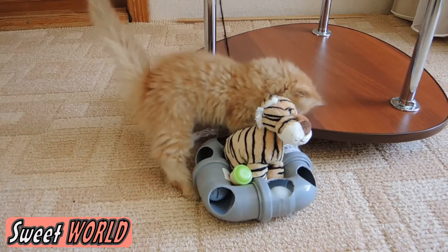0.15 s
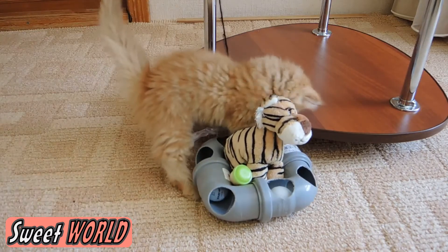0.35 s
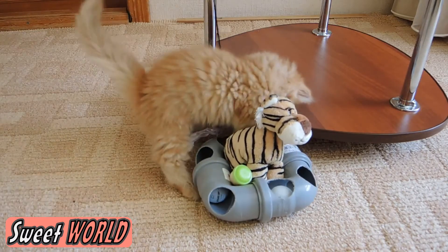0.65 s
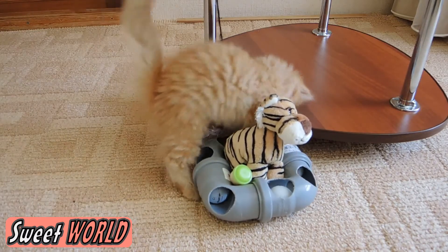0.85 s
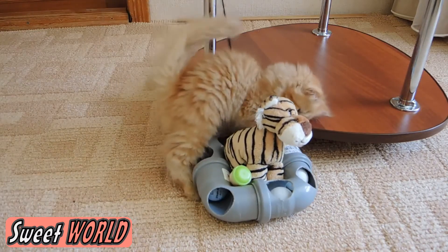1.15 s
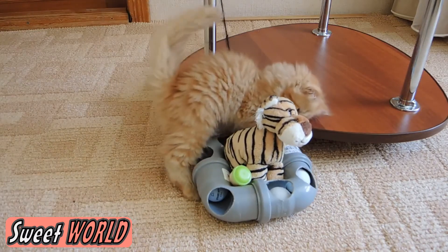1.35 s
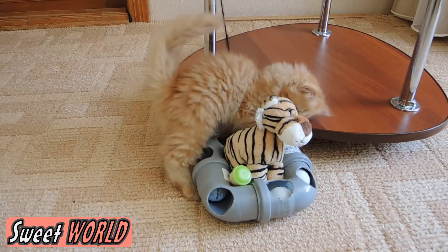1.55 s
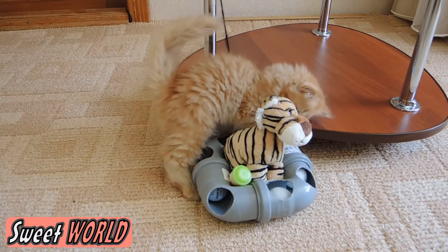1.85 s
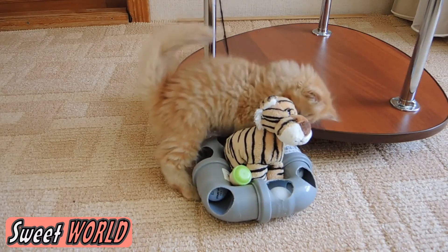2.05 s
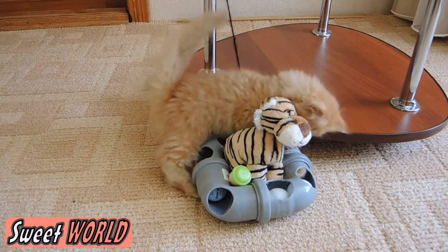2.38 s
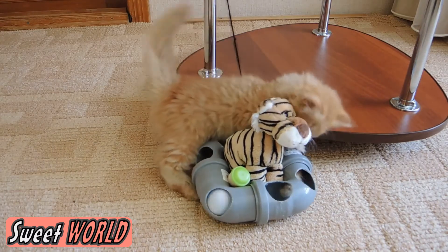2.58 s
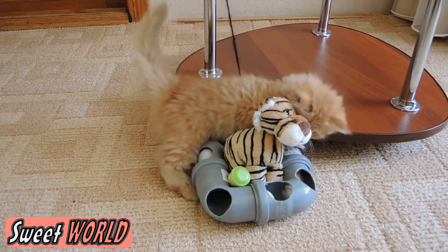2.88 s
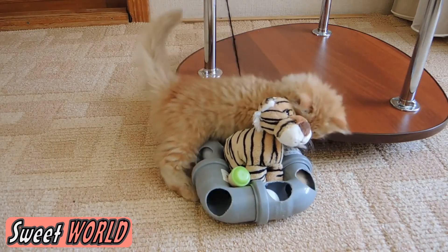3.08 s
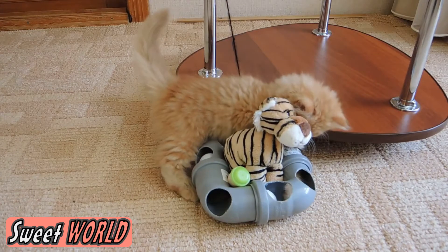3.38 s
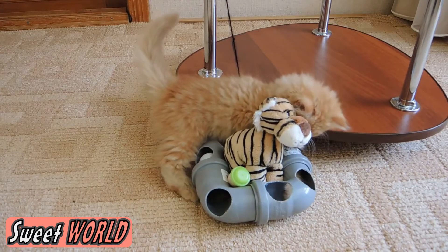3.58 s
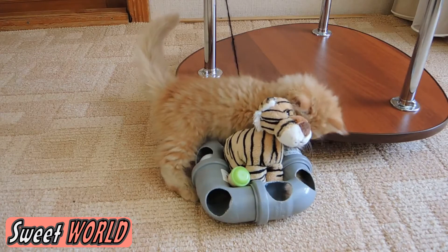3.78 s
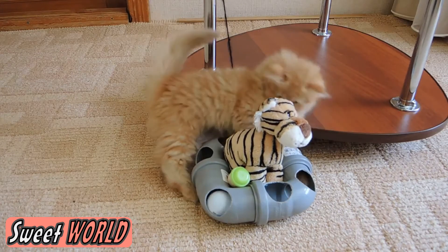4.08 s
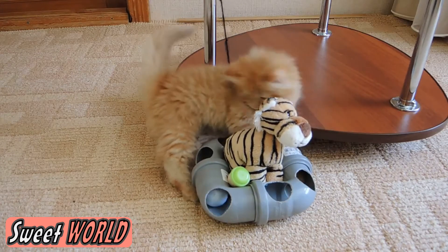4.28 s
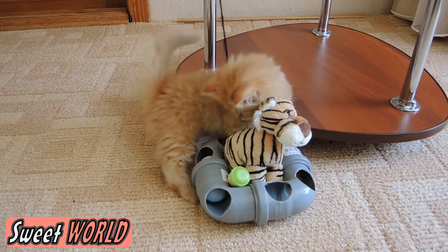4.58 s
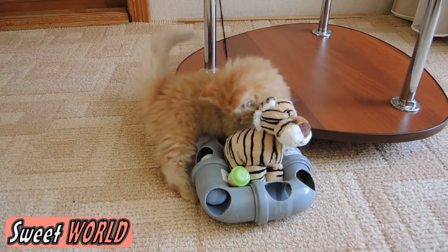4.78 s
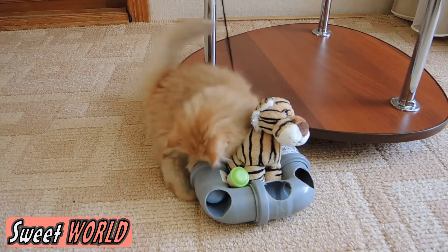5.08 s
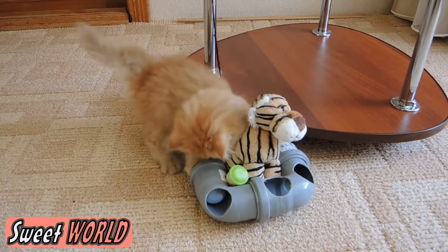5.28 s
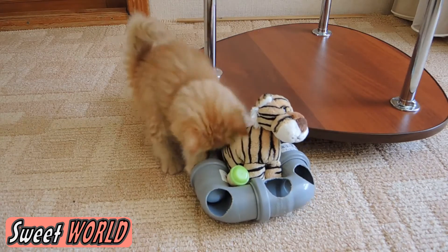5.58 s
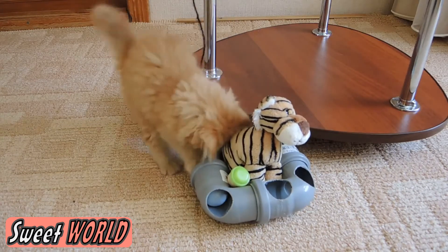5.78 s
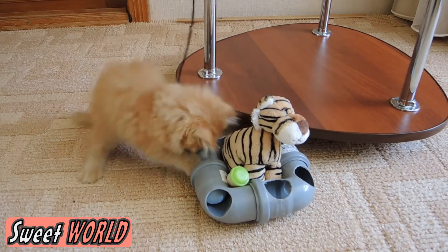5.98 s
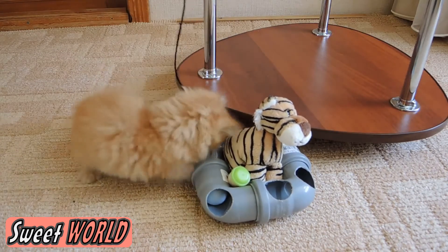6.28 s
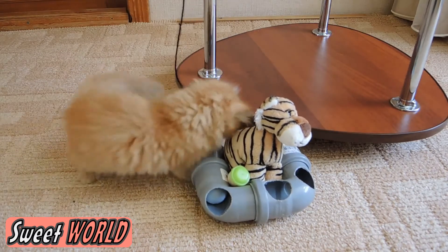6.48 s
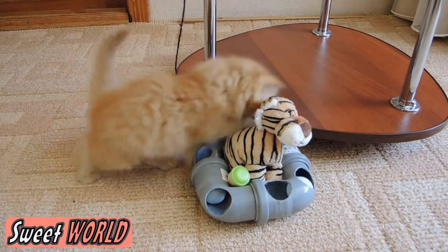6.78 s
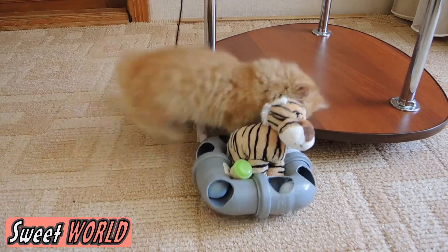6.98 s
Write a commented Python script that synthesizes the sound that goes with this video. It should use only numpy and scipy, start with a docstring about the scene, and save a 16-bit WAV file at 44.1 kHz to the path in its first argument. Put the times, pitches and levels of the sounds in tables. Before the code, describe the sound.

A quiet furnished room has steady faint hiss, low rumble and barely audible hum, with soft fur brushing that swells irregularly. A tiny knock comes at 0.1 s, then faint rubs around 0.8-1 s. At 2.3-2.6 s, small plastic ticks and a light scrape lead to a loud, dense burst from 2.75 to 2.95 s: hollow clacks, bright clicks and a short rolling rattle, fading to ticks by 3.2 s. Weak taps follow at 3.3 and 3.6 s, others at 4.2 and 4.4 s, then one clear hollow knock at 4.56 s. Around 5.25 s there is a light click with a very soft paw thump. Faint scuffing precedes gentle thuds and small taps at 6.2 s, a crisp bright scrape at 6.39 s, and an uneven hollow clatter with rolling from 6.43 to 6.9 s. A last soft tap and brief roll come near 7.05 s. The echo is short and carpet-damped.

```python
"""Faint hiss, house hum and brushing fur run throughout, while a kitten knocks and scrapes a plastic ball track.
Knocks sum ringing tube modes, a pumped air pulse, a wall clack and a rim tick; shoves roll the hollow ball,
which rumbles as random jolts ring the tube and chatters as light blows. Paw and fur strokes are dense noise
grains; paws land as decaying sines. A short echo places the toy in a furnished, carpeted room."""
import sys
import numpy as np
from scipy import signal
from scipy.fft import rfft, irfft, next_fast_len
from scipy.io import wavfile
from scipy.ndimage import uniform_filter1d

SR = 44100
rng = np.random.default_rng(int(sys.argv[2]) if len(sys.argv) > 2 else 0)


def store_wav(level_fs):
    """Save 16-bit WAV to argv[1]."""
    pcm = np.round(np.clip(np.atleast_2d(level_fs), -1, 1) * 32767)
    wavfile.write(sys.argv[1], SR, pcm.T.astype(np.int16))


N = 314874

# room tone and hiss, relative density: freq_hz, density_db
AIR_SPECTRUM = [(15, -16), (30, 0.5), (45, -7), (70, -1.5), (95, -4), (130, -1.5), (240, -1), (330, -4),
                (430, -2.5), (800, -9), (1500, -13.5), (5500, -17.5), (13800, -22), (15000, -58)]
# house hum: pitch_hz, rms_db
HUM_TONES = [(68, -73), (228, -72)]
# room tone, difference between microphone ports: freq_hz, side_minus_mid_db
AIR_SIDE_SPECTRUM = [(60, -7), (380, -8.5), (700, -5.5), (1300, -3.5), (3000, -2.5), (15000, -3)]
# paw and fur strokes, before port colour: peak_s, rise_s, level_db, treble_minus_rest_db
PAW_STROKES = [(0.15, 0.047, -64.5, 3), (0.818, 0.003, -58, -17), (0.87, 0.004, -56, -12),
               (0.97, 0.056, -59, 2), (2.135, 0.025, -59, 6), (2.425, 0.061, -50.5, 7),
               (2.55, 0.027, -48.5, -2), (2.704, 0.029, -45.5, 0), (2.735, 0.006, -36, 10),
               (2.755, 0.012, -30, 4), (2.779, 0.01, -33.5, 5), (2.833, 0.01, -37, 1),
               (2.94, 0.093, -49, 5), (3.225, 0.044, -53.5, 11), (4.39, 0.029, -62, 0),
               (5.157, 0.019, -55, -2), (5.37, 0.034, -58, 3), (5.52, 0.074, -61.5, 1),
               (5.80, 0.061, -57, 4.5), (5.942, .016, -44, 16), (6.014, .013, -48, 3),
               (6.155, 0.022, -49, -1), (6.26, .03, -47.5, -1), (6.338, .011, -48, -4),
               (6.389, 0.015, -29.5, 16), (6.393, 0.027, -34, -2), (6.667, 0.018, -35.5, 7),
               (6.703, .011, -39, 3), (6.56, 0.094, -48, 6), (7.097, 0.012, -44.5, -6)]
# tube ridges colour every stroke: freq_hz, gain_db
RIDGE_COLOUR = [(150, -27), (400, -7), (1100, 0.5), (1650, -5.5), (2200, -2.5), (2700, 0), (3300, -0.5),
                (4000, -4), (5000, -4.5), (7000, -1.5), (8700, -3), (10300, -3.5), (12000, -10.5),
                (14000, -19), (16000, -38)]
# microphone port resonances near 8.9 and 10.2 kHz, applied to rubbing and rolling: freq_hz, gain_db
PORT_COLOUR = [(900, 0), (1150, 1), (1600, -2), (2000, 2), (2700, -1), (3600, 2), (4600, -1), (8100, -4),
               (8850, 4.5), (9450, -6), (10200, 3.5), (11200, -0.5), (12000, 1.5)]
# ball and claws on the tube, levels before trims:
# start_s, body_db, hollow_hz, clack_db, wall_hz, tick_db, tick_hz
TUBE_KNOCKS = [(0.134, -48.5, 870, -49.5, 5100, -57, 10030), (0.8182, -66, 1530, -52, 3020, -62, 9000),
               (2.341, -69, 1560, -35, 3440, -48, 9200), (2.527, -35.5, 1250, -38.5, 2900, -35, 9800),
               (2.5618, -31, 890, -36, 7000, -35, 10000), (2.574, -55, 1200, -27, 5720, -30, 8900),
               (2.5957, -36.5, 870, -40, 2470, -57, 8900), (2.75, -29, 1170, -35, 3400, -41, 9900),
               (2.7541, -33, 1100, -28, 2300, -30, 8900), (2.7644, -21, 1260, -18, 1930, -24.5, 9900),
               (2.779, -27, 1180, -27.5, 3630, -41, 9000), (2.784, -28, 1100, -27, 3480, -41, 9710),
               (2.8059, -22.5, 1250, -28, 3300, -30, 8200), (2.8172, -20, 1250, -21, 3700, -17, 10300),
               (2.8235, -29, 1200, -39, 3800, -37, 8900), (2.836, -30, 1200, -27, 3550, -31, 8970),
               (2.8413, -25, 1350, -21.5, 2220, -24.5, 9200), (2.8787, -25.5, 1340, -28, 3420, -30, 9000),
               (2.887, -27.5, 1380, -24.5, 1880, -30.5, 8900), (2.895, -47, 1370, -47, 1920, -34, 8800),
               (2.906, -36, 1270, -36, 3300, -33, 10400), (2.9125, -33, 1340, -39, 3230, -34, 10000),
               (2.928, -31, 1230, -42, 3270, -39, 8800), (2.939, -31, 1230, -35, 1910, -37, 8990),
               (2.9606, -40, 1090, -40, 4200, -38, 10220), (2.967, -49, 1280, -40, 4120, -37, 9710),
               (2.985, -39, 1030, -37.5, 1970, -38, 9700), (2.991, -41, 1140, -43, 1910, -38, 10900),
               (3.003, -36, 1150, -44, 2690, -49, 9000), (3.017, -43, 1210, -52, 3420, -57, 8900),
               (3.029, -39, 1190, -44, 3520, -54, 10100), (3.043, -47, 1160, -52, 3400, -57, 8800),
               (3.058, -42, 1140, -51, 3300, -58, 8800), (3.1661, -41, 1160, -44.5, 2900, -40, 9940),
               (3.3242, -39, 1120, -50.5, 3070, -40, 10000), (3.6143, -38.5, 720, -41, 3900, -44.5, 11000),
               (3.6326, -42, 895, -42, 4100, -58, 10870), (3.645, -55, 760, -54, 3770, -60, 10070),
               (3.654, -64, 1130, -59, 2630, -66, 9920), (4.2081, -40, 1060, -53, 4160, -49, 10380),
               (4.378, -46, 950, -49, 2160, -48.5, 8430), (4.56, -21.5, 1300, -34, 3000, -30, 10100),
               (4.564, -32.5, 1560, -50, 1990, -54, 10400), (5.2669, -50, 950, -34, 4100, -39, 9000),
               (5.27, -44, 900, -52, 4400, -56, 8600), (5.28, -48, 1010, -60, 2900, -58, 9270),
               (5.9253, -51.5, 1490, -42, 6700, -32.5, 9840), (6.13, -44.5, 1300, -43.5, 3040, -47, 9900),
               (6.181, -49, 1320, -57, 3370, -60, 8690), (6.189, -44, 1190, -50, 2970, -52, 9640),
               (6.245, -52, 1380, -40, 3400, -46, 9200), (6.2053, -41, 1290, -43.5, 3400, -49, 8740),
               (6.258, -54, 1330, -37, 3730, -36, 9160), (6.279, -38.5, 1140, -35.5, 2800, -41, 8700),
               (6.327, -43, 1370, -38, 2840, -56, 8900), (6.3328, -43, 1160, -36.5, 2800, -49, 8900),
               (6.384, -49, 1100, -40, 3480, -38, 8840), (6.4368, -27.5, 730, -35, 7000, -43, 8850),
               (6.4415, -29.5, 890, -30.5, 2580, -45, 9000), (6.452, -24.5, 1280, -31.5, 3720, -38, 8700),
               (6.463, -36, 1160, -38, 6750, -45, 8900), (6.4837, -34, 970, -30, 4130, -21.5, 8730),
               (6.5029, -27.5, 970, -27.5, 3030, -48, 8620), (6.5229, -37, 1090, -38, 2800, -48, 8900),
               (6.535, -26.5, 1080, -36, 2950, -38, 8800), (6.5512, -25, 1030, -37, 2130, -42.5, 9440),
               (6.5705, -35, 1090, -35, 3040, -48, 9030), (6.5745, -31, 1000, -48, 2900, -50, 8900),
               (6.596, -25, 1140, -31.5, 2660, -39, 9000), (6.61, -41, 1100, -51, 4350, -40, 9050),
               (6.622, -34, 1090, -43, 3840, -49.5, 8430), (6.63, -28, 960, -31.5, 2970, -35, 9800),
               (6.6571, -26, 1070, -41.5, 2980, -32, 10100), (6.6678, -23, 1060, -34, 3090, -36, 9940),
               (6.69, -31, 1050, -36, 6700, -34, 9000), (6.736, -31, 1130, -23.5, 2100, -26, 8380),
               (6.753, -34, 920, -46, 4740, -43, 10210), (6.763, -43, 1220, -32, 2960, -39, 8800),
               (6.796, -26, 1150, -28.5, 2050, -29.5, 9600), (6.801, -34, 1210, -49, 1910, -44.0, 10000),
               (6.812, -33, 1290, -43, 1910, -46, 9850), (6.836, -32.5, 1150, -33.5, 1900, -29, 9850),
               (6.864, -31.5, 1156, -39.5, 5950, -40.5, 8700), (6.881, -33.5, 1210, -58, 5780, -43, 9800),
               (7.0455, -41.5, 980, -42, 3070, -48, 8900)]
# ringing modes of the plastic tube, before scatter: pitch_hz, relative_db, t60_s
TUBE_MODES = [(414, -4, 0.031), (595, -2, 0.017), (778, 1.5, 0.015), (870, -2.5, 0.02), (880, -4.5, 0.011),
              (1155, 5.5, 0.029), (1155, 5, 0.013), (1380, 0.5, 0.018), (1510, -10, 0.0057),
              (1666, 2, 0.019), (1800, -8, 0.022), (2250, 0, 0.012), (2960, -0.5, 0.023),
              (3570, -3.5, 0.018), (4130, 1.5, 0.013), (6850, 15.5, 0.0023), (8960, 4, 0.012),
              (10200, -6, 0.0078), (11000, -8, 0.011)]
# shoves that roll the ball, levels before colour and scatter:
# full_speed_s, pushed_s, coast_s, rumble_db, chatter_db
BALL_SHOVES = [(0.94, 0.029, 0.12, -56, -66), (2.47, 0.052, 0.07, -53.5, -55),
               (2.75, 0.032, 0.33, -40, -40), (2.9, 0.064, 0.26, -68, -39.5),
               (6.2, 0.055, 0.11, -52.5, -54), (6.43, 0.27, 0.38, -45, -43),
               (7.04, 0.034, 0.11, -51, -43.5)]
# kitten landing on carpet, level before attack and decay: start_s, pitch_hz, level_db, t60_s
PAW_THUDS = [(5.254, 156, -49, 0.12), (5.28, 69, -54, 0.2), (6.205, 185, -42.5, 0.17),
             (6.223, 141.6, -37, 0.18), (6.268, 142, -39, 0.16)]
# echo, difference between ports: freq_hz, side_minus_mid_db
ECHO_SIDE = [(100, -26), (400, -19), (1200, -44), (2400, -38), (4400, -17), (8500, -1), (15000, 1)]
# direct toy sound, tilt between ports: freq_hz, left_minus_right_db
TOY_BALANCE = [(6000, -1), (8300, 5), (13000, 1.3)]
# direct toy sound, unshared part: freq_hz, side_minus_mid_db
TOY_SIDE = [(400, -17), (1300, -31), (2500, -42), (4400, -35), (8500, -13), (15000, -4)]

TIME_S = np.arange(N) / SR
AIR_DB = -56
FUR_DB, FUR_SWING_DB, FUR_BRIGHT_DB = -77.5, 7.5, 18  # faint brushing throughout, swelling and fading at random
STROKE_FALL = 1.46  # fall width / rise width
CATCH_DB, SHIFT_DB = 1.9, 1.2  # swings of slip strength and of each half octave
BODY_TRIM_DB = 1.5
RIM_OVERTONE = 1.13  # ratio
SPEED_UP_S, RUMBLE_POWER = 0.055, 1.42  # gain = speed ** power
ROCK_MAX_DB, ROCK_PEAK_S, ROCK_UNDER_DB = -59, 0.011, 8.5  # ball rocks after a knock, under its body level
CHATTER_GAP_S = 0.018  # mean
ROOM_T60_S, EARLY_S, ECHO_DB = 0.24, 0.0055, -5
TOP_HZ = 16000


def undb(db):
    """Decibels to gain."""
    return 10 ** (np.asarray(db) / 20)


def unit(x):
    """Scale to rms 1."""
    return x / np.sqrt(np.mean(x ** 2))


def decay(t_s, t60_s):
    """Exponential decay, -60 dB at t60_s."""
    return np.exp(-np.log(1000) * t_s / t60_s)


def swell(t_s, peak_s):
    """Smooth rise to 1 at peak_s, then a fall."""
    return t_s / peak_s * np.exp(1 - t_s / peak_s)


def colour(x, points):
    """Filter by (freq_hz, gain_db) points joined on a log-frequency axis."""
    hz, db = np.transpose(points)
    size = next_fast_len(x.shape[-1])
    bins_hz = np.maximum(np.fft.rfftfreq(size, 1 / SR), 1)
    gain = undb(np.interp(np.log(bins_hz), np.log(hz), db))
    return irfft(rfft(x, size) * gain, size)[..., :x.shape[-1]]


def band(x, lo_hz, hi_hz, order=2):
    """Causal Butterworth band-pass."""
    edges_hz = np.clip([lo_hz, hi_hz], 10, SR / 2 - 100)
    return signal.sosfilt(signal.butter(order, edges_hz, "band", fs=SR, output="sos"), x)


def add(track, start_s, sound):
    """Mix a sound into a track at start_s."""
    start = int(np.clip(start_s * SR, 0, N - 1))
    track[..., start:start + sound.shape[-1]] += sound[..., :N - start]


def walk(rate_hz):
    """Smoothed random steps with a spread near 1."""
    hold = int(SR / rate_hz)
    steps = np.repeat(rng.standard_normal(N // hold + 1), hold)
    return 1.3 * uniform_filter1d(uniform_filter1d(steps, hold), hold)[:N]


def grains(rate_hz, spread_db):
    """Random single-sample impacts of uneven size and sign, rms 1."""
    present = rng.random(N) < rate_hz / SR
    sign = rng.choice([-1, 1], N)
    size_db = spread_db * np.minimum(rng.standard_normal(N), 2)
    return unit(present * sign * undb(size_db))


def widen(mid, other, side_points):
    """Left and right from a common part and an unrelated part."""
    side = colour(other, side_points)
    return np.array([mid + side, mid - side])


def room_tone(waver_db=-0.02, drift_rad=1.27):
    """Coloured noise for low rumble and microphone hiss, plus hum tones of wandering phase."""
    mid, other = (unit(colour(rng.standard_normal(N), AIR_SPECTRUM)) for _ in range(2))
    hum = 0
    for hz, db in HUM_TONES:
        phase = 2 * np.pi * hz * TIME_S + drift_rad * walk(2.94)
        hum = hum + undb(db) * unit(np.sin(phase))
    level = undb(AIR_DB + waver_db * walk(3.53))
    return widen(mid, other, AIR_SIDE_SPECTRUM) * level + hum


def strokes():
    """Hairs and claw tips slip in dense grains; each stroke sets its treble share."""
    slips = grains(rate_hz=7000, spread_db=4.0) * undb(CATCH_DB * walk(240))
    rub = colour(slips, RIDGE_COLOUR)
    # ridges and holes under the paw: each half octave swells and fades on its own
    edges_hz = 180 * 2 ** (np.arange(14) / 2)
    size = next_fast_len(N)
    spectrum, bins_hz = rfft(rub, size), np.fft.rfftfreq(size, 1 / SR)
    dull, bright = np.zeros((2, N))
    for lo_hz, hi_hz in zip(edges_hz, edges_hz[1:]):
        inside = (bins_hz >= lo_hz) & (bins_hz < hi_hz)
        part = irfft(spectrum * inside, size)[:N] * undb(SHIFT_DB * walk(35))
        treble = np.interp(hi_hz, [5700, 11500], [0, 1])
        dull += part * (1 - treble)
        bright += part * treble
    fur = undb(FUR_DB + FUR_SWING_DB * np.tanh(walk(11)))
    touches = [(fur, FUR_BRIGHT_DB)]
    for peak_s, rise_s, db, bright_db in PAW_STROKES:
        width_s = rise_s * np.where(TIME_S < peak_s, 1, STROKE_FALL)
        envelope = np.exp(-np.minimum(((TIME_S - peak_s) / width_s) ** 2, 20))
        touches.append((undb(db) * envelope, bright_db))
    dull_power = sum(gain ** 2 / (1 + undb(2 * bright_db)) for gain, bright_db in touches)
    bright_power = sum(gain ** 2 / (1 + undb(-2 * bright_db)) for gain, bright_db in touches)
    return unit(dull) * np.sqrt(dull_power) + unit(bright) * np.sqrt(bright_power)


def tube_ring(scatter_db, detune):
    """Decaying tube modes; each spot favours other modes, slightly retuned."""
    hz, db, t60_s = np.transpose(TUBE_MODES)[:, :, None]
    t_s = np.arange(SR // 20) / SR
    size, shift, side = rng.standard_normal((3, len(TUBE_MODES), 1))
    swing = np.sin(2 * np.pi * hz * (1 + detune * shift) * t_s) * decay(t_s, t60_s)
    return np.sum(np.sign(side) * undb(db + scatter_db * size) * swing, axis=0)


def panel(t_s, hz, t60_s, overtone, overtone_db):
    """A patch of plastic rings at its own pitch with a weaker, scattered overtone."""
    upper_hz = hz * overtone * (1 + .03 * rng.standard_normal())
    tones = np.sin(2 * np.pi * hz * t_s) + undb(overtone_db) * np.sin(2 * np.pi * upper_hz * t_s)
    return tones * decay(t_s, t60_s)


def peak_at(x, db, size=88):
    """Scale a blow so that its loudest 2 ms have this amplitude."""
    return x * undb(db) / np.sqrt(2 * uniform_filter1d(x ** 2, size, mode="constant").max())


def blow(body_db, hollow_hz, clack_db, wall_hz, tick_db, tick_hz,
         contact_s=0.00084, crack_s=0.0012, crack_db=6,
         hollow_db=19, hollow_s=0.00058, hollow_span=3.0, body_top_hz=1850,
         wall_t60_s=0.0084, wall_db=11, wall_overtone=1.14, wall_overtone_db=-5, wall_span=2.4,
         tick_t60_s=0.014, tick_ring_db=5, tick_overtone_db=-8):
    """One blow pumps the air in the tube, clacks the wall patch it hits and ticks the stiff rim."""
    ring = tube_ring(scatter_db=3.5, detune=0.022)
    t_s = np.arange(len(ring)) / SR
    # the wall gives way: the ring builds up during contact
    crack = undb(crack_db) * rng.standard_normal(len(t_s)) * swell(t_s, crack_s)
    wall = ring * (1 - np.exp(-t_s / contact_s)) + crack
    # air escapes through the paw holes within a few cycles; pitch depends on ball position
    hollow = undb(hollow_db) * np.sin(2 * np.pi * hollow_hz * t_s) * swell(t_s, hollow_s)
    body = band(wall + hollow, hollow_hz / hollow_span, hollow_hz * hollow_span, order=1)
    body = band(body, 210, body_top_hz)
    patch = undb(wall_db) * panel(t_s, wall_hz, wall_t60_s, wall_overtone, wall_overtone_db)
    clack = band(wall + patch, wall_hz / wall_span, wall_hz * wall_span, order=1)
    rim = undb(tick_ring_db) * panel(t_s, tick_hz, tick_t60_s, RIM_OVERTONE, tick_overtone_db)
    tick = band(wall + rim, 7460, 11000)
    return peak_at(body, body_db + BODY_TRIM_DB) + peak_at(clack, clack_db) + peak_at(tick, tick_db)


def knocks(trim_db=0.5):
    """Single blows of ball and claws, each coloured by the spot that is hit."""
    out = np.zeros(N)
    for start_s, *spot in TUBE_KNOCKS:
        add(out, start_s, undb(trim_db) * blow(*spot))
    return out


def ball_motion():
    """Rumble and chatter gains: the ball speeds up, is pushed along, then friction slows it evenly."""
    rumble, skips = np.zeros((2, N))
    for full_s, pushed_s, coast_s, rumble_db, chatter_db in BALL_SHOVES:
        speeding_up = 1 + (TIME_S - full_s) / SPEED_UP_S
        slowing = 1 - (TIME_S - full_s - pushed_s) / coast_s
        speed = np.clip(np.minimum(speeding_up, slowing), 0, 1)
        rumble = np.maximum(rumble, undb(rumble_db) * speed ** RUMBLE_POWER)
        skips = np.maximum(skips, undb(chatter_db) * speed ** RUMBLE_POWER)
    return rumble, skips


def rolling(motion):
    """Ball seam and track joints jolt the tube at spots that keep changing."""
    rumble = 0
    for _ in range(4):
        jolts = grains(rate_hz=70, spread_db=2) * undb(1.5 * walk(25))
        rumble = rumble + signal.fftconvolve(jolts, tube_ring(scatter_db=1.5, detune=.005))[:N]
    rumble = colour(rumble, [(80, -6), (250, 1), (450, 6.5), (800, 5.0), (1150, 0.5), (1600, 0.0),
                             (2500, -5.0), (6000, 4), (10000, -3)])
    rocking = np.zeros(N)
    for start_s, body_db, *_ in TUBE_KNOCKS:
        rock_db = min(ROCK_MAX_DB, body_db - ROCK_UNDER_DB)
        add(rocking, start_s, undb(rock_db) * swell(TIME_S[:SR // 4], ROCK_PEAK_S))
    return unit(rumble) * np.hypot(motion, rocking)


def chatter(motion, hollow_hz=1150, hollow_scatter=0.052, wall_hz=3200, wall_scatter=0.174, clack_db=-14,
            tick_hz=9500, tick_scatter=0.055, tick_db=-10, spread_db=-0.5, count=450, size=32):
    """The rolling ball skips from wall to wall at uneven gaps, harder when faster."""
    spots = []
    for place, patch, rim, contact in rng.standard_normal((size, 4)):
        spots.append(blow(0, hollow_hz * np.exp(hollow_scatter * place),
                          clack_db + spread_db * contact, wall_hz * np.exp(wall_scatter * patch),
                          tick_db + spread_db * contact, tick_hz * np.exp(tick_scatter * rim)))
    times_s = np.cumsum(CHATTER_GAP_S * (.5 + rng.random(count)))
    gains = np.interp(times_s, TIME_S, motion, right=0) * undb(spread_db * rng.standard_normal(count))
    out = np.zeros(N)
    for k, (start_s, gain) in enumerate(zip(times_s, gains)):
        add(out, start_s, gain * spots[k % size])
    return out


def thuds(attack_s=0.0043):
    """Soft paws push the floor, which booms briefly as a decaying sine."""
    out, t_s = np.zeros(N), np.arange(SR // 4) / SR
    for start_s, hz, db, t60_s in PAW_THUDS:
        envelope = (1 - np.exp(-t_s / attack_s)) * decay(t_s, t60_s)
        add(out, start_s, undb(db) * np.sin(2 * np.pi * hz * t_s) * envelope)
    return out


def room(x, first_s=0.0031, port_lag_s=.00001):
    """Direct sound, tilted between the ports, plus a short, dense echo from table and walls."""
    t_s = np.arange(SR // 2) / SR
    fade = (t_s > first_s) * (decay(t_s, ROOM_T60_S) + np.exp(-t_s / EARLY_S))
    mid, other = rng.standard_normal((2, len(t_s))) * fade / np.sqrt(np.sum(fade ** 2))
    response = widen(mid, other, ECHO_SIDE)[:, :SR // 3]
    echo = signal.fftconvolve(response, x[None], axes=1)[:, :N]
    # carpet and cloth swallow part of the treble
    echo = colour(echo, [(150, 5.5), (850, -5.0), (1150, 0.5), (1600, 2), (2800, -3.5), (6000, -5.0),
                         (10000, -2), (15000, -10)])
    hz, db = np.transpose(TOY_BALANCE)
    left, right = (colour(x, np.column_stack([hz, sign * db / 2])) for sign in (1, -1))
    # ports sit close together: the left hears the toy only slightly later
    size = next_fast_len(N)
    lag = np.exp(-2j * np.pi * np.fft.rfftfreq(size, 1 / SR) * port_lag_s)
    left = irfft(rfft(left, size) * lag, size)[:N]
    return np.array([left, right]) + undb(ECHO_DB) * echo


def scene():
    """Toy and kitten in the room."""
    rumble, skips = ball_motion()
    toy = knocks() + chatter(skips) + colour(rolling(rumble) + strokes(), PORT_COLOUR)
    # the tube beams treble unevenly: each port catches a slightly different crack and scrape
    beams = widen(0, knocks() + colour(strokes(), PORT_COLOUR), TOY_SIDE)
    return room(toy) + thuds() + beams + room_tone()


def record(dry):
    """Steep elliptic low-pass cuts the top."""
    return signal.sosfilt(signal.ellip(8, .2, 70, TOP_HZ, fs=SR, output="sos"), dry)


dry = scene()
out = record(dry)
store_wav(out)
```